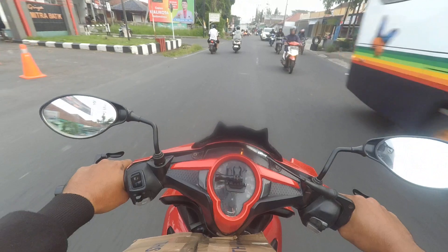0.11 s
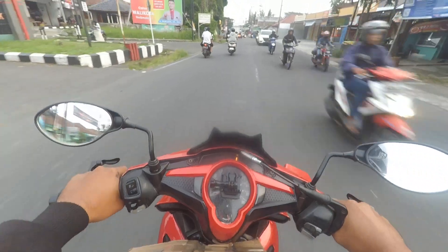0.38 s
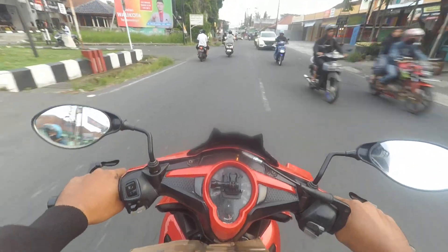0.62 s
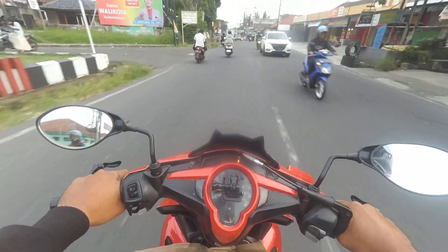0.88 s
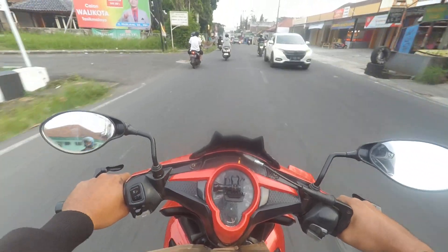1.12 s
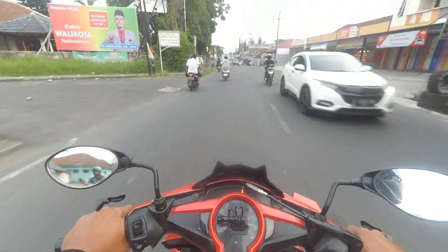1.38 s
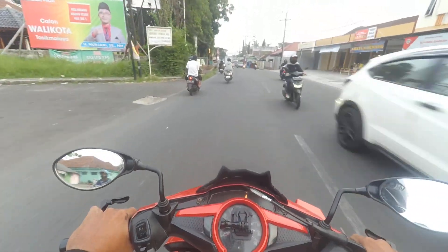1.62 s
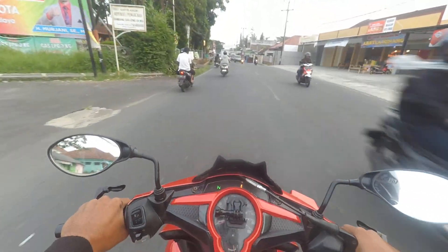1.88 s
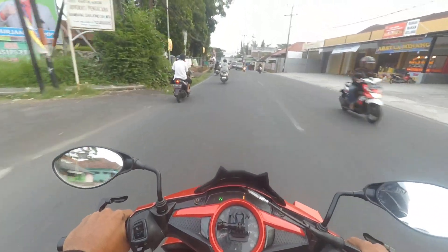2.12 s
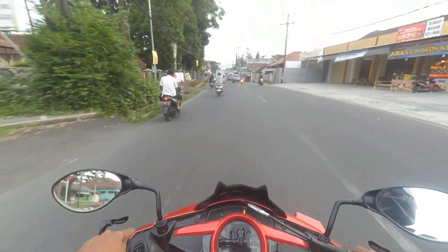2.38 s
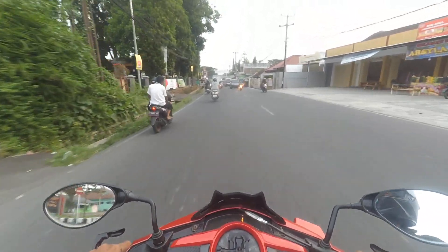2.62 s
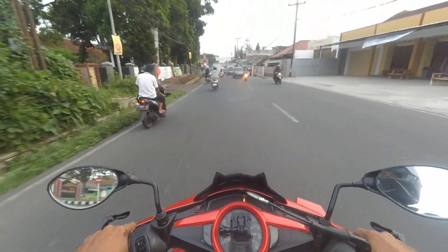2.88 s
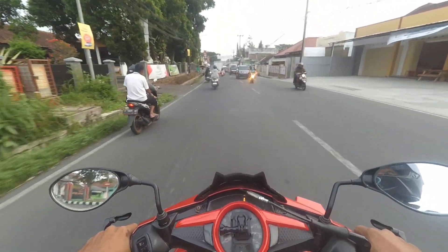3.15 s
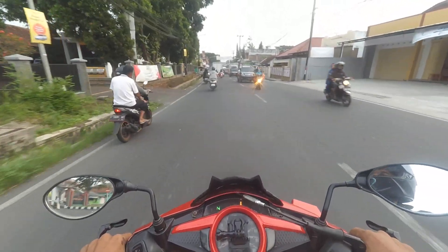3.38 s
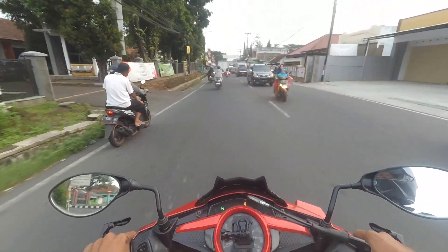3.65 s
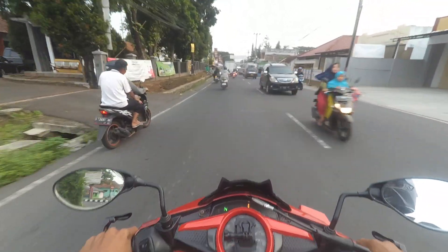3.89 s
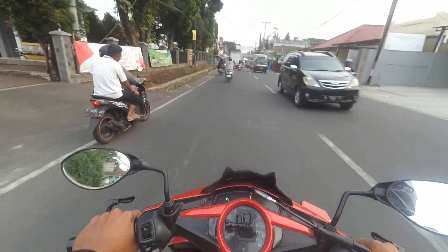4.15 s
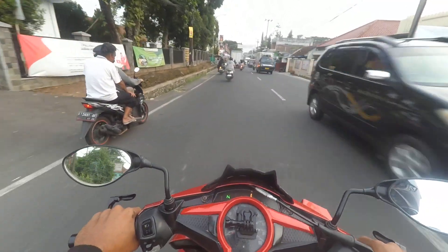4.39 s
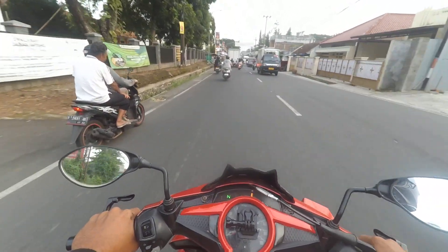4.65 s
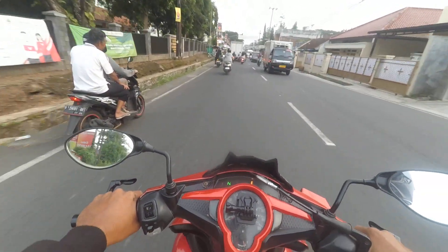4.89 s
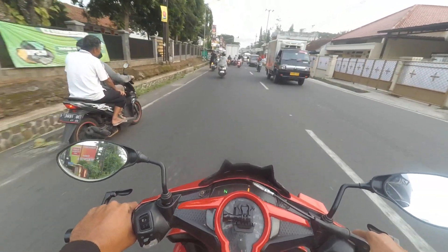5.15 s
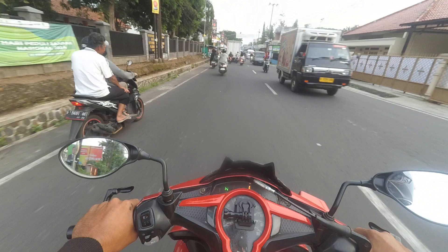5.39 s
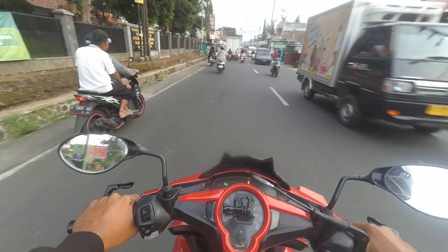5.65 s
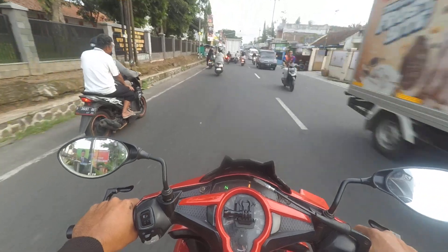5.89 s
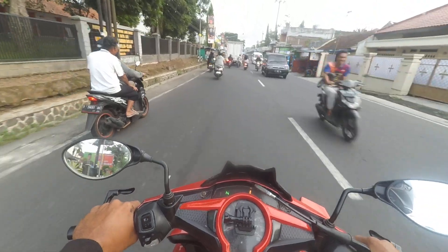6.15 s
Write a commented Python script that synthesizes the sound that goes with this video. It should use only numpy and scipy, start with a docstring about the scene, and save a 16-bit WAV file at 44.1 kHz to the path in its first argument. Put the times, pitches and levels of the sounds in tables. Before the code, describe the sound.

From the saddle, a small scooter engine barks steadily, then burbles unevenly off throttle while oncoming vehicles hiss past and a lorry whines by.

```python
"""A small single-cylinder scooter rolls through town, heard from its saddle by a cased action camera.
It sets off barking on open throttle while vehicles swell past in hissing noise and engines tick by.
Noise-made squeaks dart in and low wind noise buffets the case; off throttle the engine slows unevenly,
each stroke a gas pulse ringing the pipe: a bark if the charge burns, a thud if not.
Near the end a lorry's grainy tone whines by, falling in pitch, and the last strokes bark again."""
import sys
import numpy as np
from scipy import signal
from scipy.io import wavfile
from scipy.ndimage import uniform_filter1d

SR = 44100
rng = np.random.default_rng(int(sys.argv[2]) if len(sys.argv) > 2 else 0)


def invert_db(level):
    """Linear amplitude ratio for a level in decibels (20 dB per decade), elementwise."""
    return 10 ** (np.asarray(level, dtype=float) / 20)


def wav_out(sig):
    """Save sig, one row per channel (or a flat mono array), as 16-bit PCM at SR to the path in sys.argv[1]."""
    wavfile.write(sys.argv[1], SR, np.round(np.clip(np.atleast_2d(sig).T, -1, 1) * 32767).astype(np.int16))


N = 276462  # samples

# Noise spectra, only their shape counts: pitch_hz, level_db (per Hz)
RUMBLE_SPECTRUM = [(40, -10.5), (65, -6.5), (130, -5.5), (220, -14.5), (400, -14), (600, -24.5), (900, -35)]
TYRE_SPECTRUM = [(350, -20), (600, -1.5), (1000, -3), (1120, -3.5), (1220, -1.5), (1520, -5), (2050, -12.5),
                 (2600, -18), (3380, -52.5), (5720, -120)]
SWISH_SPECTRUM = [(1290, -32), (2200, 0.5), (2870, -0.5), (3350, -1.5), (3720, 1), (4700, -19),
                  (6110, -47.5), (10300, -120)]
HISS_SPECTRUM = [(2590, -19.5), (4400, -3.5), (4710, -4), (6360, -5), (10900, -14), (13400, -16.5),
                 (14500, -19), (15500, -27)]
SPIT_SPECTRUM = [(900, -1), (4000, -13.5), (6000, -26), (15500, -26)]
# Gusts on the case: closest_s, half_length_s, level_db
GUSTS = [(.32, 0.18, -25), (1.13, 0.06, -27.5), (1.45, .15, -32), (1.71, 0.054, -17), (2.05, .12, -35.5),
         (2.71, .04, -27.5), (3.1, 0.16, -34.5), (3.93, .05, -25), (4.25, .12, -31), (4.47, .04, -24.5)]
# Far traffic: tyre_roar_db, swish_db, hiss_db
STREET_DB = (-47, -58.5, -66.5)
# Vehicles going by: closest_s, half_length_s, tyre_roar_db, swish_db, hiss_db
VEHICLES = [(0.1, 0.3, -38, -50, -56), (.33, 0.11, -37.5, -45.5, -53), (.47, 0.073, -38, -48, -47),
            (.8, 0.3, -41, -49.5, -57.5), (1.22, 0.074, -40.5, -58, -62.5), (1.55, 0.22, -43.5, -58, -68),
            (1.92, 0.13, -40.5, -53.5, -60), (2.06, .05, -43.5, -54.5, -61),
            (2.32, 0.18, -46.5, -56, -66.5), (3.45, 0.15, -48, -62.5, -67), (3.8, 0.2, -43.5, -51, -62),
            (4.17, 0.23, -45.5, -54, -65), (4.62, 0.14, -44.5, -58, -62.5), (5.65, 0.033, -53, -60, -74),
            (6.1, 0.32, -47, -55, -62.5)]
# Narrow squeaks and whirs: start_s, length_s, pitch_hz, width_hz, level_db
SQUEAKS = [(0.201, 0.082, 1454, 90, -42.5), (.33, 0.056, 1443, 80, -36.5), (0.456, 0.11, 2470, 300, -44.5),
           (0.653, 0.07, 10350, 80, -70), (0.86, 0.094, 10380, 60, -65), (1.085, .075, 10500, 79, -76),
           (1.85, .1, 10400, 80, -76), (1.96, 0.018, 3730, 250, -44), (2.265, .02, 3800, 250, -52),
           (2.146, .125, 10500, 70, -63.5), (2.172, 0.1, 9400, 120, -73), (2.28, .07, 10500, 80, -75),
           (3.785, 0.31, 1620, 305, -46), (5.194, .14, 3670, 80, -67), (5.219, 0.023, 3644, 50, -49.5)]
# Oncoming engines ticking past: closest_s, half_length_s, ticks_per_s, level_db, first_tick_s
PASSING_ENGINES = [(0.464, 0.091, 45.5, -41, .26), (2.052, 0.15, 32.3, -51, 1.8364),
                   (3.807, 0.043, 41, -55, 3.6)]
# Resonances of one tick: pitch_hz, level_db, t60_s
TICK_MODES = [(2600, -11, 0.0053), (3960, -5.5, 0.0041), (5600, -17, 0.003), (6000, -9.5, 0.0024),
              (7470, -10.5, 0.0022), (9080, -16.5, 0.0023)]
# Whine of the lorry going by: time_s, pitch_hz, level_db
LORRY_WHINE = [(5.72, 535, -62), (5.76, 533.7, -32), (5.83, 527.4, -42), (5.88, 530.3, -45),
               (5.92, 558, -34), (6.0, 537, -34), (6.1, 522, -25.5), (6.27, 484, -35)]
# Engine speed: time_s, strokes_per_s (exhaust strokes)
ENGINE_SPEED = [(0.0, 27.67), (0.48, 27.73), (0.72, 28.79), (0.96, 28.53), (1.21, 25.65), (1.33, 28.44),
                (1.69, 26.71), (1.87, 29.08), (1.93, 31.52), (2.53, 23.48), (2.65, 26.19), (3.38, 23.83),
                (3.5, 25.78), (3.62, 25.55), (4.1, 20.35), (4.52, 18.55), (4.7, 23.86), (5.31, 18.03),
                (5.43, 18.72), (5.49, 17.23), (6.03, 15.26), (6.27, 26.63)]
# Throttle open, every charge burns: first_stroke_s, last_stroke_s, burn_db, last_stroke_weaker_db
OPEN_THROTTLE = [(0, 1.063, 1.9, 9), (1.833, 1.965, 2.5, 4), (3.476, 3.554, 2, 3), (4.579, 4.712, 1.5, 3),
                 (5.23, 5.284, -8.5, -0.5), (5.393, 5.505, -10, -1.5), (6.115, 6.249, 2.3, 2.5)]
# Throttle shut, a trace of charge still burns: time_s, burn_db
FAINT_BURN = [(1.16, -37), (2.05, -42.5), (2.4, -22), (3.1, -28), (3.35, -18), (3.9, -21), (5.05, -13.5),
              (5.55, -21.5)]
# Uneven strokes off throttle: time_s, burn_db, thud_change_db, extra_crack_db
UNEVEN_STROKES = [(2.392, -17, 0.5, 17), (2.635, -26, -3.5, 1), (2.751, -3.5, -2.5, -12.5),
                  (2.945, -13.5, -3, 2), (3.108, -12, -2, 4.5), (3.271, -13.5, 0, 10.5),
                  (3.395, -13, -16, 2), (3.437, -14.5, -3.5, 2), (3.714, -24.5, -4.5, 5.5),
                  (3.926, -3.5, -6, -5), (4.115, -7, -39, 1.5), (4.213, -10, -34, 0.5),
                  (4.471, -6, -32, 3.5), (4.527, -25.5, -8, 3), (4.798, -23, -6.5, -8),
                  (4.888, -7.5, 4, -6), (4.98, -5, -35, -4.5), (5.127, -8, -23, 3), (5.742, -5.5, -25, 0),
                  (5.868, -10, 0, -5), (5.932, -7, -27, 5), (6.059, 0, -30, 0.5)]
# Pipe modes, higher when the gas is hot: pitch_hz, level_db, t60_s, polarity (signed gain)
HOT_PIPE = [(107, -4.5, 0.1, -0.75), (161.2, 4.5, 0.03, 0.35), (269.7, 10, 0.0049, -0.4),
            (378.4, -15, 0.1, 0.78), (413.3, -2, 0.047, 0.91), (503.4, 7.5, 0.047, 0.57),
            (700, 4, 0.0061, -0.77)]
COOL_PIPE = [(89.3, -6, 0.048, 0.89), (106.2, -4.5, 0.089, -0.99), (188.6, -24.5, 0.061, 0.92),
             (404, -24, 0.063, -0.43), (446, -28.5, 0.068, -0.99)]


def rms_one(x):
    """Scale to unit rms."""
    return x / np.sqrt(np.mean(x ** 2) + 1e-20)


def in_time(rows, at=None):
    """Columns of a curve, read at every sample or at given times."""
    time_s, *columns = np.transpose(rows)
    at = np.arange(N) / SR if at is None else at
    return [np.interp(at, time_s, column) for column in columns]


def drift(rate_hz):
    """Slow random wander of spread 1: noise at every 40th sample through a double one-pole."""
    pole = np.exp(-80 * np.pi * rate_hz / SR)
    noise = rng.standard_normal(N // 40 + 2002)
    slow = signal.lfilter([1], [1, -2 * pole, pole * pole], noise)[2000:]  # skip the filter's start
    return np.interp(np.arange(N) / 40, np.arange(len(slow)), rms_one(slow))


def decay(t60_s):
    """Per-sample factor of an exponential that falls 60 dB in t60_s."""
    return invert_db(-60 / (t60_s * SR))


def ring(x, hz, t60_s):
    """A resonance: a unit click sets a decaying sine of height 1 ringing."""
    r, w = decay(t60_s), 2 * np.pi * hz / SR
    return signal.lfilter([0, np.sin(w)], [1, -2 * r * np.cos(w), r * r], x + 1e-18)


def clicks(times, gains):
    """A train of single-sample clicks."""
    out = np.zeros(N)
    places = np.clip((np.asarray(times) * SR).astype(int), 0, N - 1)
    np.add.at(out, places, gains)
    return out


def coloured(spectrum, patchy_db):
    """Fifth-octave bands of noise, each with its own level and flicker; rms 1."""
    hz, level_db = np.transpose(spectrum)
    edges = hz[0] * 2 ** np.arange(0, np.log2(hz[-1] / hz[0]) + .01, 1 / 5)
    white, out, shared = rng.standard_normal((2, N)), 0, drift(27.0)
    for k, (low, high) in enumerate(zip(edges, edges[1:])):
        band_pass = signal.butter(2, [low, min(high, .45 * SR)], "band", fs=SR, output="sos")
        band = signal.sosfilt(band_pass, white[k % 2])
        centre_db = np.interp(np.log(low * high) / 2, np.log(hz), level_db)
        flicker = 0.62 * shared + drift(45.0)
        out = out + band * invert_db(centre_db + patchy_db * flicker)
    return rms_one(out)


def swells(rows, base_db):
    """Levels in dB: each event adds power, its amplitude halved half_length_s from the closest moment."""
    t = np.arange(N) / SR
    power = invert_db(np.atleast_1d(base_db))[:, None] ** 2
    for closest_s, half_s, *level_db in rows:
        nearness = 1 / (1 + ((t - closest_s) / half_s) ** 2)
        power = power + (invert_db(level_db)[:, None] * nearness) ** 2
    return 10 * np.log10(power)


def rumble():
    """A steady bed of low noise with a slight flicker in every band."""
    return invert_db(-36.5) * coloured(RUMBLE_SPECTRUM, patchy_db=1.0)


def wind():
    """Lumpy pressure on the case, far below the engine note: a wandering breeze and a few gusts."""
    breeze_db, swing_db, wander_hz = -39.5, 5, 4.6
    band_pass = signal.butter(2, [10.0, 30.0], "band", fs=SR, output="sos")
    low = signal.sosfilt(band_pass, rng.standard_normal(N))
    level_db = swells(GUSTS, breeze_db)[0] + swing_db * drift(wander_hz)
    return invert_db(level_db) * rms_one(low)


def traffic():
    """Tyre roar, swish and hiss: far traffic holds a floor and each vehicle swells above it."""
    roar_db, swish_db, hiss_db = swells(VEHICLES, STREET_DB)
    roar = invert_db(roar_db) * coloured(TYRE_SPECTRUM, patchy_db=1.0)
    swish = invert_db(swish_db) * coloured(SWISH_SPECTRUM, patchy_db=1.0)
    hiss = invert_db(hiss_db) * coloured(HISS_SPECTRUM, patchy_db=1.0)
    return roar + swish + hiss


def squeaks():
    """Noise twice through a narrow resonance, gated and fluttering."""
    out, t, flutter = np.zeros(N), np.arange(N) / SR, drift(63.0)
    for start_s, length_s, hz, width_hz, level_db in SQUEAKS:
        end_s = start_s + length_s
        span = slice(max(int((start_s - .03) * SR), 0), int((end_s + .03) * SR))
        t60_s = np.log(1000) / (np.pi * width_hz)  # a narrower resonance rings longer
        once = ring(rng.standard_normal(N // 8), hz, t60_s)
        tone = rms_one(ring(once, hz, t60_s))[:span.stop - span.start]
        inside_s = np.minimum(t[span] - start_s, end_s - t[span])
        gate = np.clip(inside_s / .008 + .5, 0, 1)  # 8 ms ramps
        out[span] += invert_db(level_db + 1.4 * flutter[span]) * gate * tone
    return out


def passing_engines():
    """Each passing engine spits a burst of gas at its firing rate, swelling to its closest moment."""
    out = np.zeros(N)
    soft, fall = decay(0.0071), decay(0.054)  # onset and fall of a burst
    for closest_s, half_s, rate, level_db, first_s in PASSING_ENGINES:
        times = first_s + np.arange(26) / rate + .0008 * rng.standard_normal(26)
        near = invert_db(level_db) / (1 + ((times - closest_s) / half_s) ** 2)
        for hz, mode_db, t60_s in TICK_MODES:
            vary_db = 2.5 * rng.standard_normal(len(times))
            hits = clicks(times, near * invert_db(mode_db + vary_db))
            burst = signal.lfilter([1 - soft], np.convolve([1, -soft], [1, -fall]), hits)
            out += ring(burst * rng.standard_normal(N), hz, t60_s)
    return out


def lorry():
    """A wavering, grainy tone: narrow noise rides on it."""
    hz, level_db = in_time(LORRY_WHINE)
    phase = 2 * np.pi * np.cumsum(hz * (1 + .012 * drift(30.0))) / SR
    grain = .5 * (drift(35.0) * np.sin(phase) + drift(35.0) * np.cos(phase))
    return invert_db(level_db) * (np.sin(phase) + grain)


def strokes():
    """Strokes fall where the crank count passes a whole number; burn, thud and crack levels for each."""
    count = .15 + np.cumsum(in_time(ENGINE_SPEED)[0]) / SR
    times = np.flatnonzero(np.diff(np.floor(count), prepend=-1)) / SR  # the first falls at 0 s
    faster = in_time(ENGINE_SPEED, times)[0] - 27.27  # strokes per s above cruise
    thud_db = 1.32 + 0.49 * faster  # unburnt strokes soften as the engine slows
    crack_db = 0.36 * faster  # a faster engine cracks harder
    burn_db = in_time(FAINT_BURN, times)[0]
    for first_s, last_s, level_db, fade_db in OPEN_THROTTLE:
        on = np.flatnonzero((times > first_s - .015) & (times < last_s + .015))
        burn_db[on] = level_db
        burn_db[on[-1]] -= fade_db
        thud_db[on] = burn_db[on] - 14.5
    for time_s, level_db, change_db, extra_db in UNEVEN_STROKES:
        k = np.argmin(abs(times - time_s))  # nearest stroke
        burn_db[k] = level_db
        thud_db[k] += change_db
        crack_db[k] += extra_db
    return times, burn_db, thud_db, crack_db


def pipe(times, level_db, crack_db, modes, width_s):
    """A smooth gas pulse per stroke rings every pipe mode, a little differently each time."""
    t = np.arange(-5 * width_s, 5 * width_s, 1 / SR)
    pulse = np.exp(-.5 * (t / width_s) ** 2)
    vary_db = .9 * rng.standard_normal((len(times), len(modes)))
    rung = np.zeros(N)
    for k, (hz, mode_db, t60_s, polarity) in enumerate(modes):
        stroke_db = level_db + mode_db + vary_db[:, k]
        if hz > 270:  # crack lifts only the upper modes
            stroke_db = stroke_db + crack_db
        rung += polarity * ring(clicks(times, invert_db(stroke_db)), hz, t60_s)
    return signal.fftconvolve(rung, pulse / pulse.sum(), "same")


def tail_pipe(times, level_db):
    """Burnt gas rushes out: a short puff of hiss, and a slower rasp in the low mids."""
    rise = int(.003 * SR)  # samples
    hits = clicks(times, invert_db(level_db))
    puff = uniform_filter1d(signal.lfilter([1], [1, -decay(.03)], hits), rise)
    rush = signal.lfilter([1], [1, -decay(.07)], hits)
    for _ in range(2):
        rush = uniform_filter1d(rush, int(.003 * SR / 2))
    rasp_spectrum = [(200, -5), (450, -1.5), (700, -1), (900, -16.5), (1200, -36.0)]  # pitch_hz, level_db
    spit = invert_db(-51) * puff * coloured(SPIT_SPECTRUM, patchy_db=2.0)
    rasp = invert_db(-31.5) * rush * coloured(rasp_spectrum, patchy_db=2.5)
    return spit + rasp


def engine():
    """Each stroke mixes a bark from the hot pipe, a slightly earlier thud from the cool one and a puff."""
    times, burn_db, thud_db, crack_db = strokes()
    bark = pipe(times, burn_db, crack_db, HOT_PIPE, width_s=0.00068)
    thud_crack_db = 1.5 * rng.standard_normal(len(times))
    thud = pipe(times - 0.0039, thud_db, thud_crack_db, COOL_PIPE, width_s=0.00046)
    return bark + thud + tail_pipe(times, burn_db + crack_db)


def scene():
    """All sources at the camera, in one channel."""
    background = rumble() + wind() + traffic()
    passing = squeaks() + passing_engines() + lorry()
    return (background + passing + engine())[None]


def low_pass(x):
    """Removes everything above the highest recorded frequency."""
    return signal.sosfilt(signal.butter(12, 15710, fs=SR, output="sos"), x)


def record(dry):
    """The finished mix as the camera hears it."""
    return low_pass(dry)


dry = scene()
out = record(dry)
wav_out(out)
```